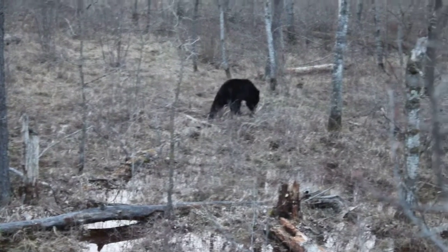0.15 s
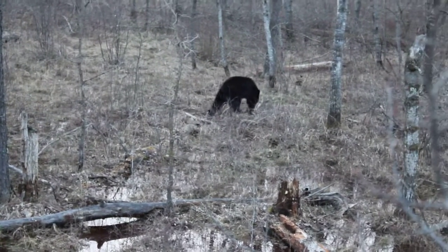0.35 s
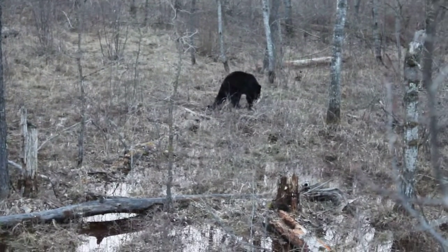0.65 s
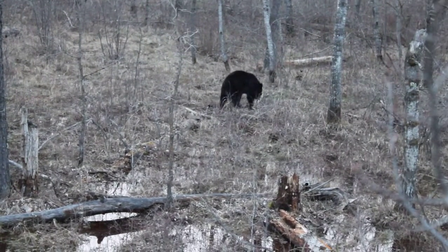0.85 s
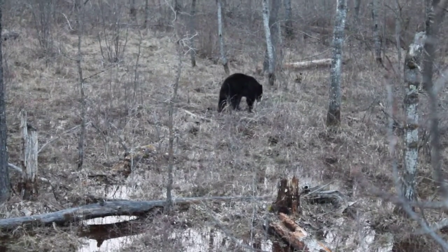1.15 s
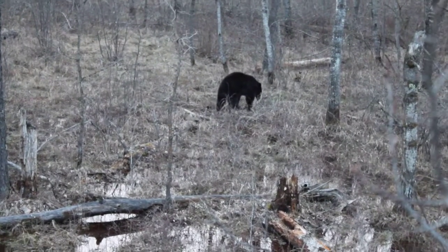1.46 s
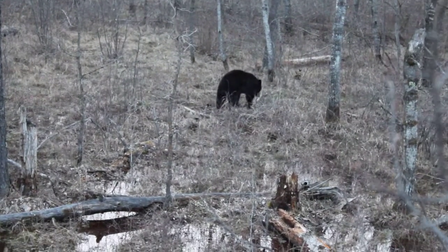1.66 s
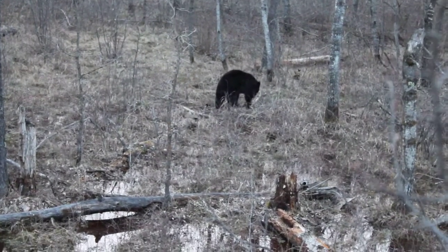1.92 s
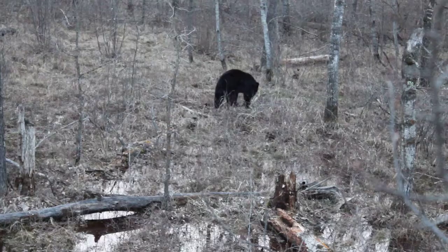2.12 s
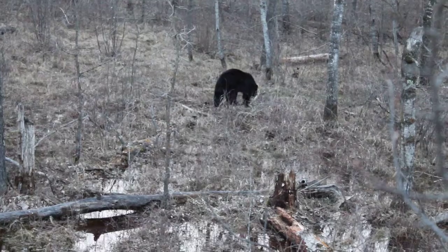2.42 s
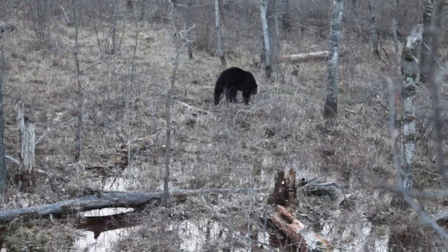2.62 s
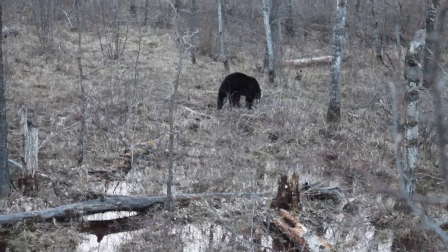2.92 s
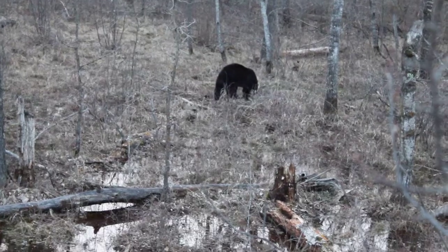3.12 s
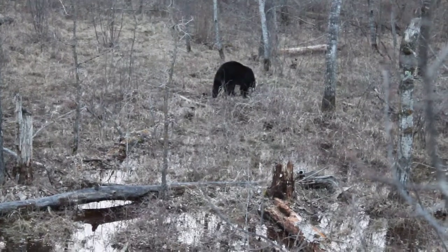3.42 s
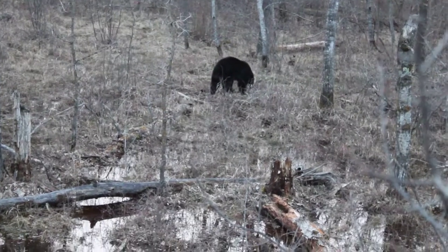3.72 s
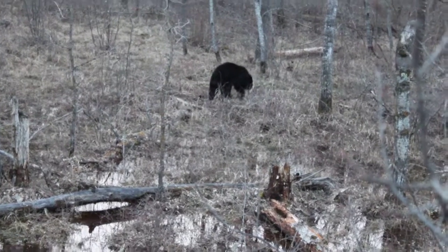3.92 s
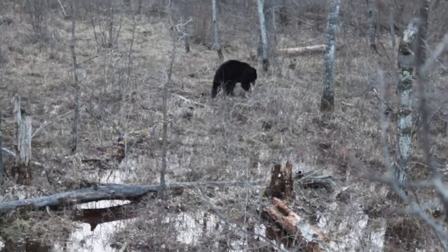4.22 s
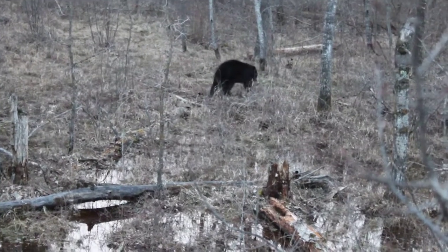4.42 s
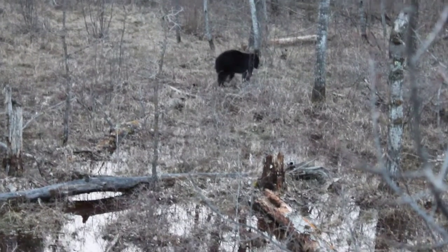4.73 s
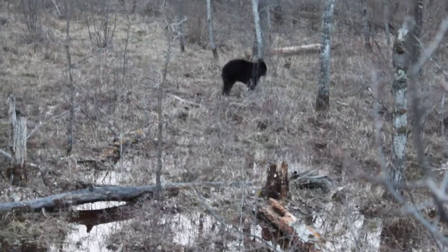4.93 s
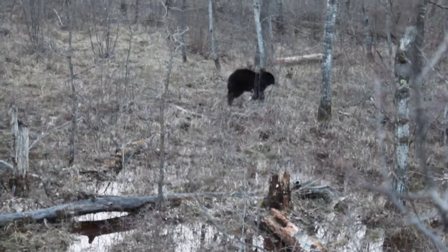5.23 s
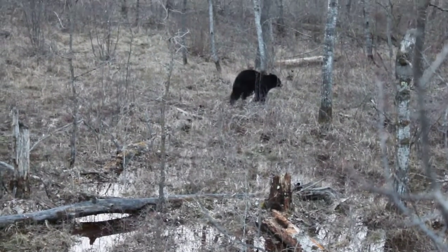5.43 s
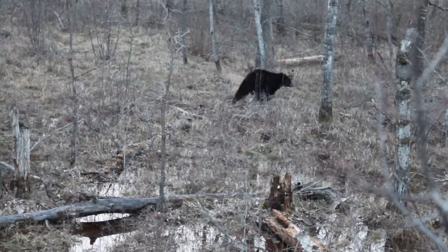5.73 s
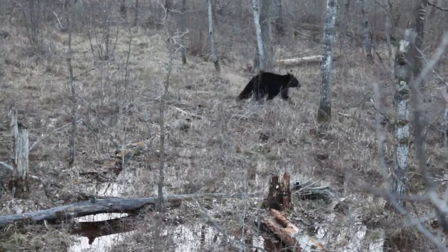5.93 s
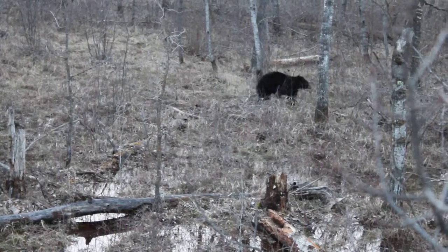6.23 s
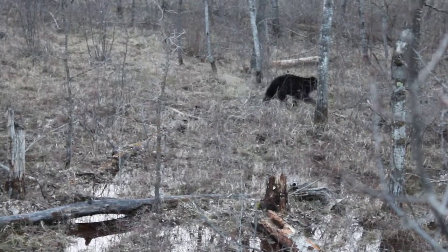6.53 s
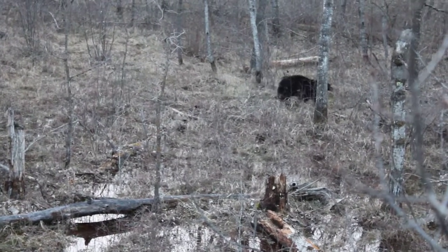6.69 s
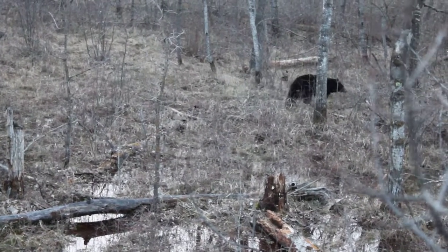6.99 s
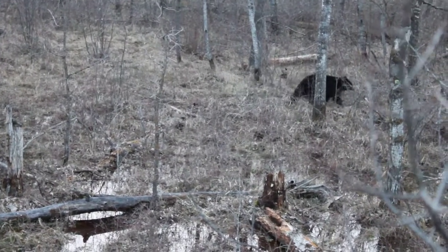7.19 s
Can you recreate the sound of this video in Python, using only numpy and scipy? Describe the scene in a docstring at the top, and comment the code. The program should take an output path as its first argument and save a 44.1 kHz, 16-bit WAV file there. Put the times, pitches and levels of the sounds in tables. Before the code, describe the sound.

A quiet, wet, leafless wood with a steady faint hush, weighted to the lows, and thin dry grass rustle. At 0.08 s a dull knock comes with a soft scuff; tiny twig snaps tick at about 0.3, 0.7, 1.1, 1.6 and 2.1 s, with a grass brush near 1.0 s. After feeble clicks at 2.3 s, a frog dominates: ten bright, separate creaking pulses from 2.4 to about 2.9 s, starting weaker, slowing and climbing in pitch, the last two hurried, the final one weak and high. A light scuff falls at 3.9 s. A longer trill of fourteen pulses runs from 4.5 to about 5.3 s. A very faint, mostly falling whistle follows at 5.4-5.7 s. A sharper twig crack at 6.0 s leads into grass brushes, small snaps and soft low bumps until 7.3 s. Short woody echoes surround the frog and twigs.

```python
"""The soft hush of a wet, leafless wood comes first, with a rustle of dry grass and a dull knock.
Twigs snap now and then; a chorus frog in a puddle gives two creaking trills; a faint whistle follows.
Hush and rustle are coloured noise; knocks, bumps and larynx clicks are damped rings; twigs are splintering noise.
Each trill is a row of tiny falling chirps that climb in pitch; trunks and stems scatter them back."""
import sys
import numpy as np
from scipy import signal
from scipy.fft import rfft, irfft
from scipy.io import wavfile

SR = 44100
rng = np.random.default_rng(int(sys.argv[2]) if len(sys.argv) > 2 else 0)


def materialize(psi):
    """Save the field psi as 16-bit PCM at rate SR to the path in sys.argv[1].

    A 1-D psi becomes a single channel; in a 2-D psi each row is a channel.
    """
    bounded = np.clip(np.atleast_2d(psi).T, -1, 1)
    quanta = np.round(bounded * 32767).astype(np.int16)
    wavfile.write(sys.argv[1], SR, quanta)


N = 324355
TIME = np.arange(N) / SR


def from_db(db):
    """Decibels to gain."""
    return 10 ** (np.asarray(db) / 20)


def rms_one(x):
    """Scale to unit rms."""
    return x / np.sqrt(np.mean(x ** 2) + 1e-20)


def in_time(rows):
    """Each column of a curve at every sample."""
    start_s, *columns = np.transpose(rows)
    return [np.interp(TIME, start_s, column) for column in columns]


def band(x, low_hz, high_hz, order=2):
    """Causal band-pass."""
    edges_hz = [low_hz, min(high_hz, .45 * SR)]
    return signal.sosfilt(signal.butter(order, edges_hz, "band", fs=SR, output="sos"), x)


def coloured(noise, spectrum):
    """Give a noise a smooth spectrum, drawn on a log frequency axis; rms 1."""
    hz, db = np.transpose(spectrum)
    bins_hz = np.maximum(np.fft.rfftfreq(N, 1 / SR), 1)
    gain = from_db(np.interp(np.log(bins_hz), np.log(hz), db))
    return rms_one(irfft(rfft(noise) * gain, N))


def add(out, start_s, sound):
    """Mix a short sound in at a time."""
    at = max(round(start_s * SR), 0)
    out[at:at + len(sound)] += sound[:max(N - at, 0)]


def swell(t, peak_s, shape):
    """Envelope that rises from 0 to 1 at peak_s, then dies away; a higher shape is tighter."""
    return (t / peak_s * np.exp(1 - t / peak_s)) ** shape


def blips(rows):
    """Damped rings: a sine under a quick swell, for rows of start_s, level_db, ring_hz, swell_s."""
    out = np.zeros(N)
    t = np.arange(SR // 8) / SR
    for start_s, level_db, ring_hz, swell_s in rows:
        ring = swell(t, swell_s, shape=0.87) * np.sin(2 * np.pi * ring_hz * t)
        add(out, start_s, from_db(level_db) * ring)
    return out


HUSH_DB, HUSH_WANDER_DB, HUSH_WANDER_S = -56, 0.65, 0.392   # level, its drift, time between drift points
# spectrum of the hush: pitch_hz [Hz], level_db [dB per Hz, relative]
HUSH_COLOUR = [(15, -49), (25, -20), (53, -13), (86, -15.5), (184, -5), (241, -1.5), (316, -2.5),
               (449, -3.5), (812, -4.5), (1550, -12), (5670, -24), (6310, -24), (15800, -33.5)]


def hush():
    """Far air in the trees: broad noise weighted to the lows, wandering a little in level."""
    point_s = np.arange(20) * HUSH_WANDER_S
    wander = np.interp(TIME, point_s, rng.standard_normal(len(point_s)))
    level = from_db(HUSH_DB + HUSH_WANDER_DB * wander)
    return level * coloured(rng.standard_normal(N), HUSH_COLOUR)


# spectrum of the rustle: pitch_hz [Hz], level_db [dB per Hz, relative]
GRASS_COLOUR = [(1180, -16), (2000, -4), (2420, -12), (3510, -6), (6770, -4), (9080, -9.5), (10500, -20.5),
                (12000, -15.5), (15800, -15.5)]
# steady stirring of the dry grass, before the rustle gain: start_s [s], level_db [dB]
GRASS_STIRRING = [(0, -73.5), (1.5, -74), (2.1, -84), (3.3, -78), (4.1, -72), (4.35, -68), (5.5, -71),
                  (6.0, -65), (6.3, -71.5), (7.35, -68.5)]
# single brushes through the grass, before the rustle gain: start_s [s], level_db [dB], swell_s [s to peak]
GRASS_BRUSHES = [(.06, -67, .06), (1.0, -60.5, 0.05), (3.89, -69.5, 0.027), (6.125, -64, 0.024),
                 (6.61, -62.5, 0.026), (6.76, -65.5, .04), (7.16, -63, 0.047)]
# soft, dull scuffs: start_s [s], level_db [dB], centre_hz [Hz], swell_s [s to peak]
GRASS_SCUFFS = [(.085, -58, 1410, 0.039), (3.89, -55.5, 900, .025), (5.985, -60.5, 1550, 0.028),
                (6.15, -57.5, 1480, 0.015), (6.615, -56, 1700, 0.0072), (6.77, -62, 1520, 0.032)]


def grass(grains_per_s, rustle_db):
    """Dry blades brush past each other in dense tiny clicks; scuffs are duller."""
    power = from_db(in_time(GRASS_STIRRING)[0]) ** 2
    for start_s, level_db, swell_s in GRASS_BRUSHES:
        brush = swell(np.maximum(TIME - start_s, 0), swell_s, shape=1.25)
        power += (from_db(level_db) * brush) ** 2
    grains = rng.standard_normal(N) * (rng.random(N) < grains_per_s / SR)
    out = from_db(rustle_db) * np.sqrt(power) * coloured(grains, GRASS_COLOUR)
    for start_s, level_db, centre_hz, swell_s in GRASS_SCUFFS:
        stroke = swell(np.maximum(TIME - start_s, 0), swell_s, shape=0.87)
        dull = rms_one(band(grains, centre_hz / 1.26, centre_hz * 1.12, order=1))
        out += from_db(level_db) * stroke * dull
    return out


# parts of one dull knock: start_s [s], level_db [dB], ring_hz [Hz], swell_s [s to peak]
KNOCK_RINGS = [(.0798, -38.5, 380, 0.00039), (.0815, -47.5, 1360, .0018)]


def knock():
    """Two damped rings, low and higher, nearly together make one dull knock."""
    return blips(KNOCK_RINGS)


# snapping twigs: start_s [s], level_db [dB before a 5 dB trim], centre_hz [Hz], decay_s [s],
# width_octaves [octaves]
TWIG_SNAPS = [(.2789, -48, 2180, .002, .8), (0.7066, -42.5, 4500, .0015, 0.86),
              (0.794, -52, 4200, .006, .5), (1.1344, -44, 5600, .003, 0.37), (1.51, -49, 6230, .002, .4),
              (1.6207, -48, 2580, 0.0024, 0.49), (2.0891, -46.5, 4180, 0.01, 2.3),
              (5.683, -52, 9000, 0.0028, .6), (5.9830, -35, 3970, 0.0024, 2),
              (6.4354, -46, 6000, .002, 0.9), (6.622, -45, 3200, 0.0055, 1.6),
              (6.641, -48.5, 4000, 0.0091, 1.6), (6.777, -49, 4000, 0.015, 1.5)]


def twigs(splinters_per_s, snap_db):
    """Each snap opens with one sharp click, then splinters for a few milliseconds."""
    out = np.zeros(N)
    t = np.arange(SR // 12) / SR
    for start_s, level_db, centre_hz, decay_s, width_octaves in TWIG_SNAPS:
        splinters = rng.standard_normal(len(t)) * (rng.random(len(t)) < splinters_per_s / SR)
        splinters[0] = from_db(snap_db)
        spread = 2 ** (width_octaves / 2)
        crack = rms_one(band(splinters, centre_hz / spread, centre_hz * spread)) * np.exp(-t / decay_s)
        add(out, start_s, from_db(level_db - 5) * crack)
    return out


STEM_FADE_S = 0.59   # time over which the steady part of the stem echoes fades by 60 dB each
# echoes from the ground and near trunks, each with its own colour: delay_s [s], level_db [dB],
# bright_hz [Hz, sets the band]
TRUNK_ECHOES = [(.0052, -15, 3820), (.0095, -16, 6200), (.0135, -12.5, 7050), (0.025, -31, 2230),
                (.0332, -28.5, 4200), (0.052, -24, 2180)]


def wood(x, scatter_db, scatter_hz, stems_per_s):
    """A few distinct echoes, then a dying spray from thin stems, which throw back little bass."""
    t = np.arange(SR) / SR
    # the echoes crowd closer together with time, as more stems are reached
    stems = rng.standard_normal(SR) * (rng.random(SR) < stems_per_s * (1 + t / .04) / SR)
    fade = from_db(-60 * t / STEM_FADE_S) + 3.3 * np.exp(-t / 0.011)
    spray = stems * (t > .007) * fade
    spray /= np.sqrt(np.sum(spray ** 2))
    response = from_db(scatter_db) * band(spray, scatter_hz, 9900)
    for delay_s, level_db, bright_hz in TRUNK_ECHOES:
        echo = band(signal.unit_impulse(SR // 200), bright_hz / 1.53, bright_hz * 1.36, order=1)
        add(response, delay_s, from_db(level_db) * echo)
    return x + signal.fftconvolve(x, response)[:N]


# soft low bumps: start_s [s], level_db [dB], ring_hz [Hz], swell_s [s to peak]
BUMP_RINGS = [(1.965, -57, 85, 0.0056), (3.01, -57, 75, 0.0044), (6.29, -62, 54.6, 0.0099),
              (6.35, -65, 65, 0.0089), (6.49, -58, 72, 0.0091), (6.53, -56, 80, 0.0064),
              (6.92, -58, 65, 0.0082), (7.22, -65, 60, 0.01), (7.28, -58, 61.6, 0.0077)]


def bumps():
    """Soft bumps: low damped rings that swell over several milliseconds."""
    return blips(BUMP_RINGS)


# feeble clicks of the larynx as a trill starts or stops: start_s [s], level_db [dB], ring_hz [Hz],
# swell_s [s to peak]
LARYNX_CLICKS = [(2.3073, -42.5, 2640, 0.00024), (2.3526, -31.5, 2650, 0.0003),
                 (2.9599, -28, 2980, 0.00021), (4.4686, -40.5, 2760, 0.00021)]


def larynx_clicks():
    """The larynx ticks feebly around a trill, each tick a damped ring."""
    return blips(LARYNX_CLICKS)


# the gaps lengthen towards the longest gap, over so many pulses
LONGEST_GAP_S, SLOWING_PULSES = .1133, 18.8
# the frog warms up: the first pulse is weaker and softer, and the next ones close in on full strength
WARM_UP_PULSES, COLD_LOSS_DB, COLD_SWELL_S = 3.1, 9, 0.00037
# pitch climbs as the vocal sac fills: the first step, and the power of the pulse count that follows
CLIMB_HZ, CLIMB_POWER = 32.5, 0.72
# a pulse at full strength: its swell, and its fundamental against the second harmonic
SWELL_S, FUNDAMENTAL_DB = 0.0013, -9
# the closing gesture over the last pulses adds a softer swell and more fundamental
CLOSING_PULSES, CLOSING_SWELL_S, CLOSING_FUNDAMENTAL_DB = 0.45, 0.00029, 5
PULSE_JITTER_DB, PULSE_JITTER_HZ = 0.5, 4.5
# the frog's trills: start_s [s], pulse_count [pulses], first_gap_s [s], closing_gap_s [s, hurried last
# pulses], full_level_db [dB], start_pitch_hz [Hz], last_lift_hz [Hz], last_loss_db [dB]
FROG_TRILLS = [(2.3846, 10, .04713, .06375, -16, 1461, 75, 3.5),
               (4.5093, 14, .04779, .06683, -15.5, 1482, 130, 7.0)]


def pulses():
    """A trill slows, swells and climbs, then ends on two hurried pulses, the last one high and weak."""
    rows = []
    for start_s, count, first_gap_s, closing_gap_s, full_db, start_hz, lift_hz, loss_db in FROG_TRILLS:
        k = np.arange(round(count))
        gaps_s = LONGEST_GAP_S - (LONGEST_GAP_S - first_gap_s) * np.exp(-k[:-1] / SLOWING_PULSES)
        gaps_s[-2:] = closing_gap_s
        pulse_s = start_s + np.append(0, np.cumsum(gaps_s))
        cold = np.exp(-k / WARM_UP_PULSES)
        closing = np.exp(-k[::-1] / CLOSING_PULSES)
        level_chance, pitch_chance = rng.standard_normal((len(k), 2)).T
        level_db = full_db - COLD_LOSS_DB * cold - loss_db * (k == k[-1])
        level_db = level_db + PULSE_JITTER_DB * level_chance
        pitch_hz = start_hz + CLIMB_HZ * k ** CLIMB_POWER + lift_hz * closing
        pitch_hz = pitch_hz + PULSE_JITTER_HZ * pitch_chance
        swell_s = SWELL_S + COLD_SWELL_S * cold + CLOSING_SWELL_S * closing
        fundamental_db = FUNDAMENTAL_DB + CLOSING_FUNDAMENTAL_DB * closing
        rows += zip(pulse_s, level_db, pitch_hz, swell_s, fundamental_db)
    return rows


def chirp(t, hz, sag, sag_s):
    """Phase of a tone that starts sharp and sags, passing through hz after sag_s."""
    return 2 * np.pi * np.cumsum(hz * (1 + sag * (np.exp(-t / sag_s) - np.exp(-1)))) / SR


# weak overtones of a pulse: multiple [times the pitch], level_db [dB against the second harmonic]
PULSE_OVERTONES = [(3, -23), (4, -33.5), (5, -40), (6, -45)]


def frog():
    """Each puff snaps the vocal cords open; pitch sags, and the vocal sac rings on at the second harmonic."""
    out = np.zeros(N)
    t = np.arange(SR // 60) / SR
    for start_s, level_db, pitch_hz, swell_s, fundamental_db in pulses():
        cords = chirp(t, 1.015 * pitch_hz, sag=0.18, sag_s=0.0015)
        sac = chirp(t, 2 * pitch_hz, sag=0.081, sag_s=0.0022)
        puff = swell(t, 0.69 * swell_s, shape=1.47)
        pulse = swell(t, swell_s, shape=1.28) * np.sin(sac)
        pulse += from_db(fundamental_db) * puff * np.sin(cords)
        # the overtones are brief and sound with the sharp opening of the cords
        opening = chirp(t, pitch_hz, sag=0.22, sag_s=0.002)
        snap = swell(t, 0.65 * swell_s, shape=0.74)
        for multiple, overtone_db in PULSE_OVERTONES:
            pulse += snap * from_db(overtone_db) * np.sin(round(multiple) * opening)
        # a thin bright rasp, as strong in weak pulses as in loud ones
        noise = rng.standard_normal(len(t))
        rasp = from_db(-48) * band(noise, 4200, 9200) + from_db(-44.5) * band(noise, 8500, 9100)
        add(out, start_s, from_db(level_db) * pulse + snap * rasp)
    # so small a body radiates no bass; the extreme treble is cut too
    return band(out + larynx_clicks(), 1270, 8830, order=8)


# a faint whistle far off, falling but for a brief upturn: start_s [s], pitch_hz [Hz], level_db [dB]
WHISTLE_PATH = [(5.36, 3380, -80), (5.42, 3150, -55), (5.48, 2860, -61), (5.54, 2650, -62),
                (5.58, 2570, -64), (5.64, 2910, -63), (5.72, 2800, -88)]


def whistle(blur_hz):
    """A mostly falling tone, blurred by its many paths through the trees."""
    pitch_hz, level_db = in_time(WHISTLE_PATH)
    blur = rms_one(band(rng.standard_normal(N), 16, blur_hz))
    return from_db(level_db) * blur * np.sin(2 * np.pi * np.cumsum(pitch_hz) / SR)


def scene():
    """Frog and twigs sound through the wood, over its hush; grass, knock and bumps stay dry."""
    far = hush() + whistle(blur_hz=130)
    rustle = grass(grains_per_s=3000, rustle_db=3.0)
    thumps = knock() + bumps()
    voices = twigs(splinters_per_s=6000, snap_db=5.0) + frog()
    near = wood(voices, scatter_db=-13.0, scatter_hz=1980, stems_per_s=550)
    return (far + rustle + thumps + near)[None]


CUTOFF_HZ = 15900


def record(dry):
    """A steep elliptic low-pass removes the very top."""
    return signal.sosfilt(signal.ellip(12, .1, 80, CUTOFF_HZ, fs=SR, output="sos"), dry)


dry = scene()
out = record(dry)
materialize(out)
```